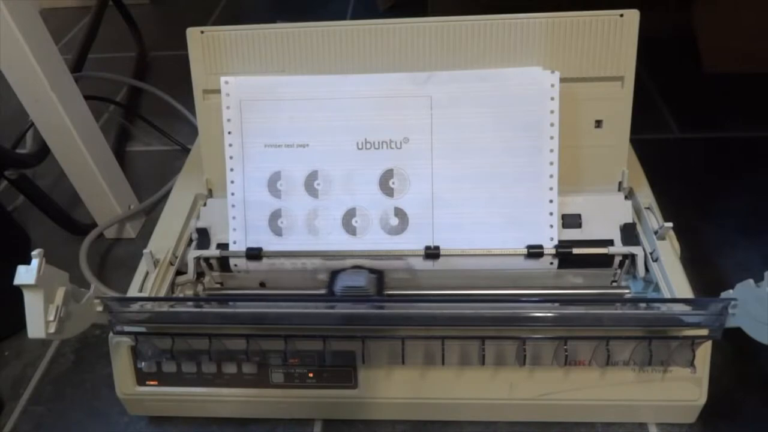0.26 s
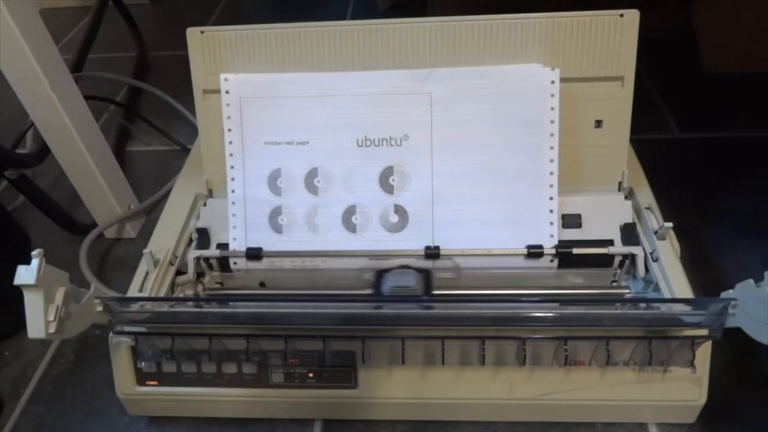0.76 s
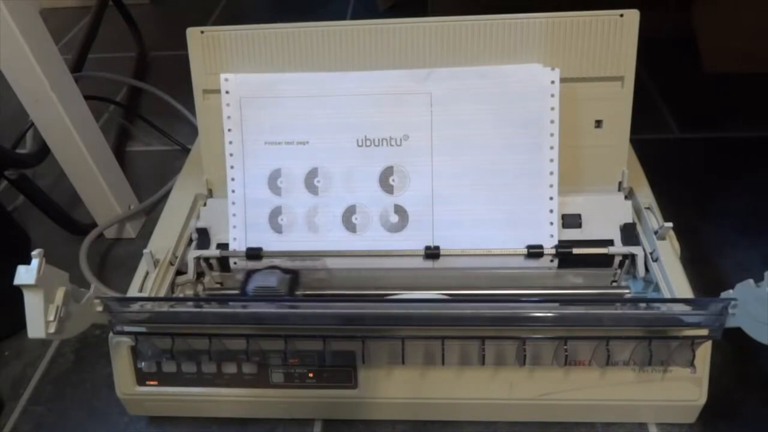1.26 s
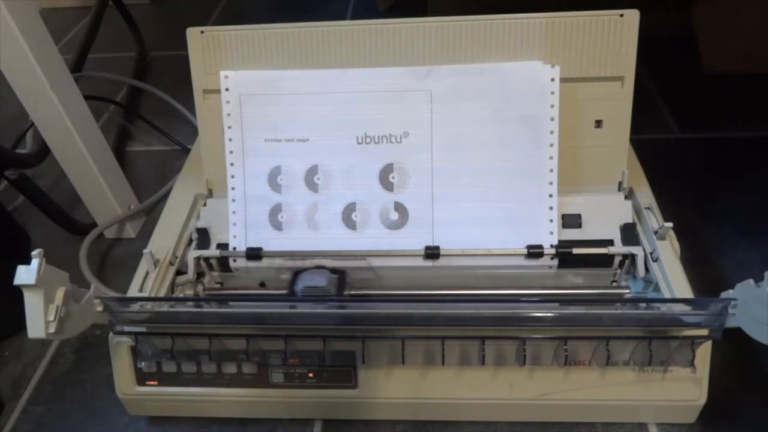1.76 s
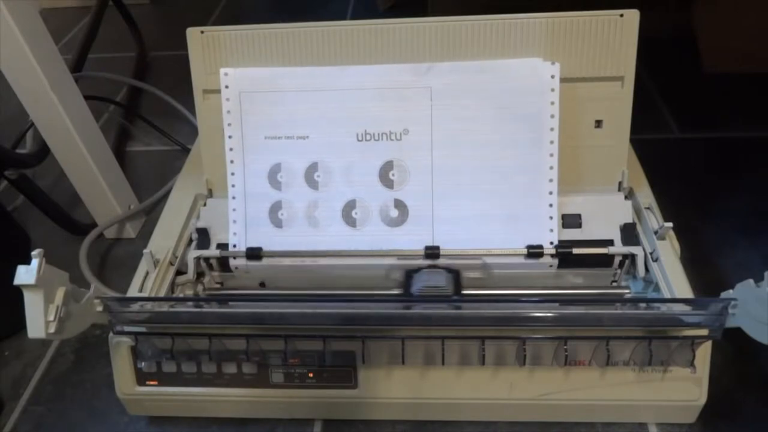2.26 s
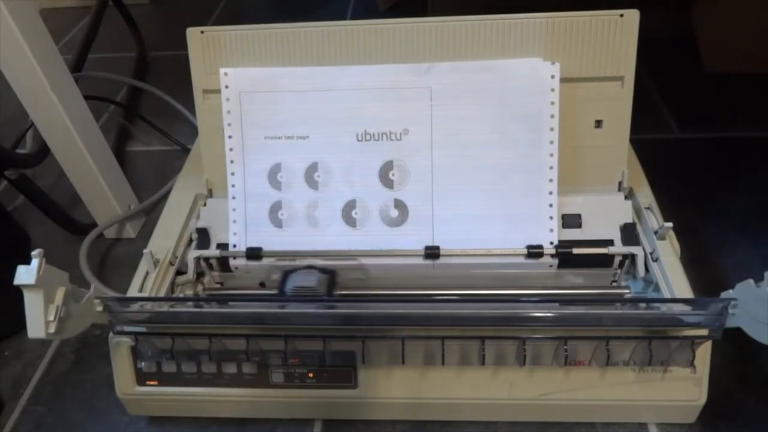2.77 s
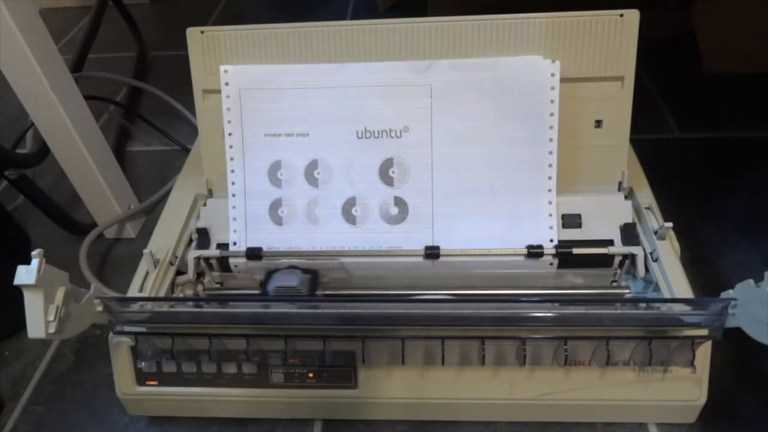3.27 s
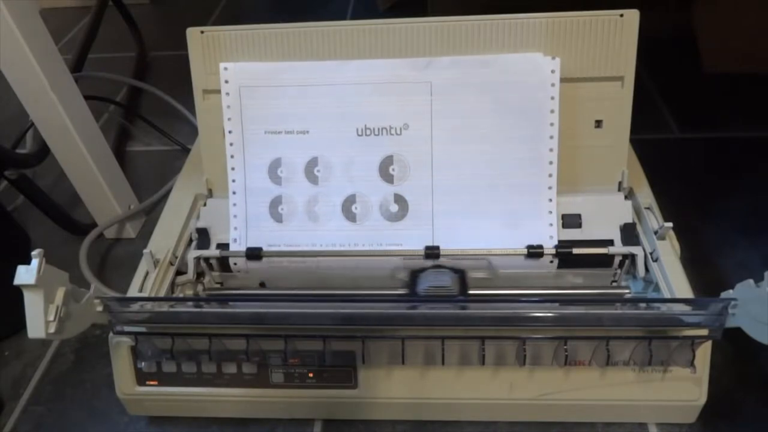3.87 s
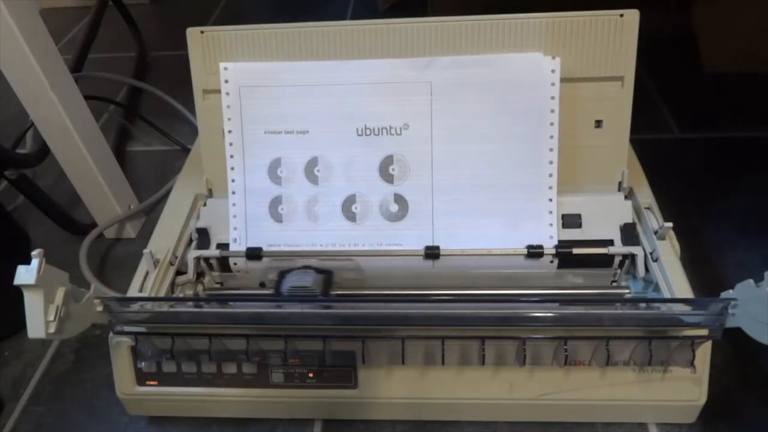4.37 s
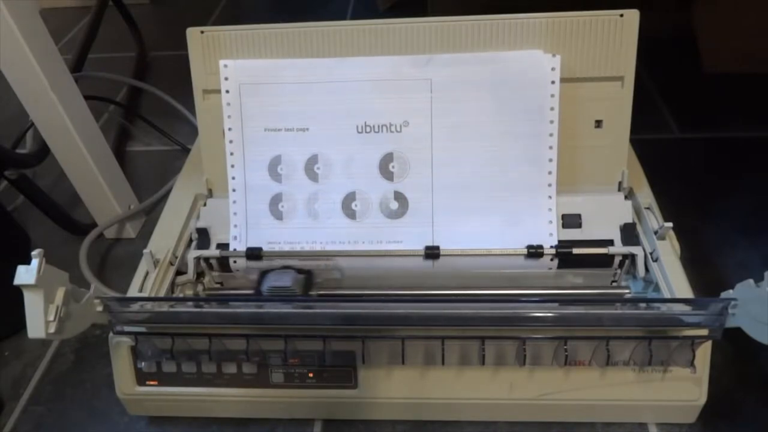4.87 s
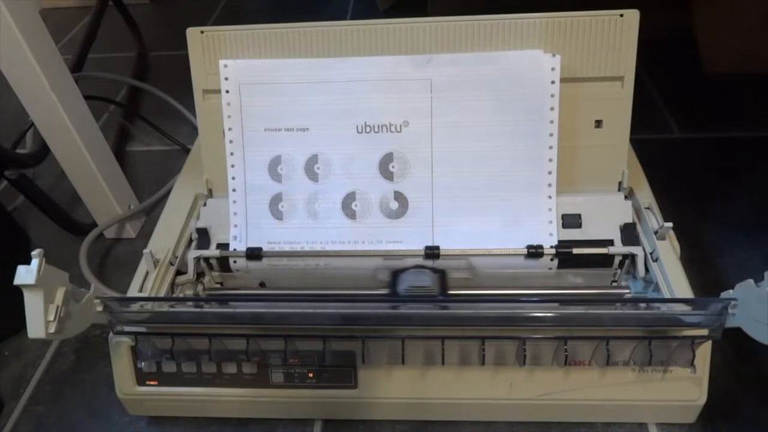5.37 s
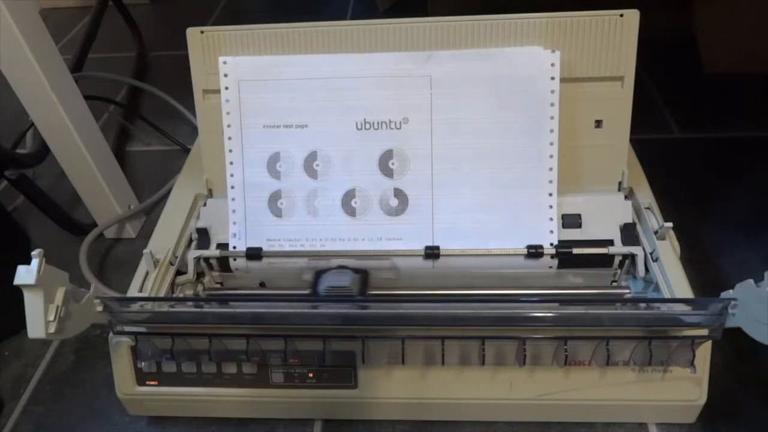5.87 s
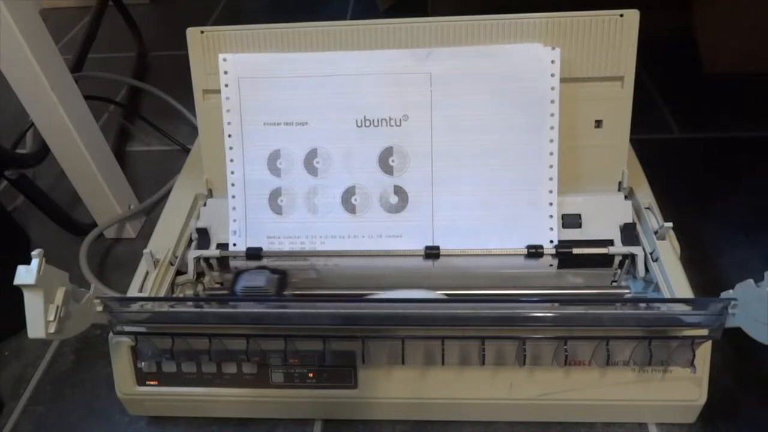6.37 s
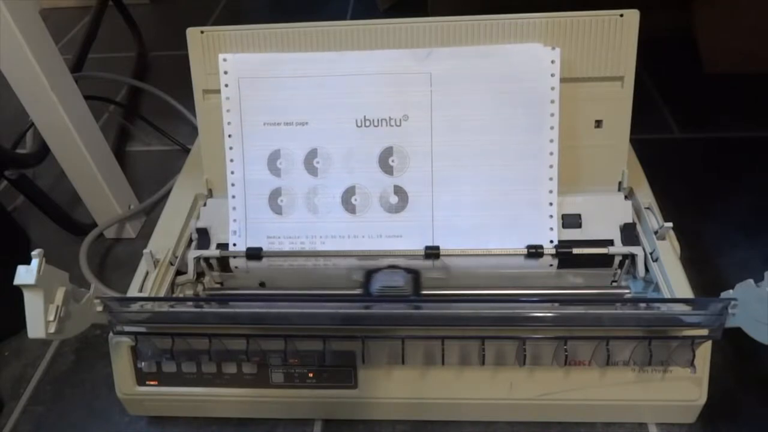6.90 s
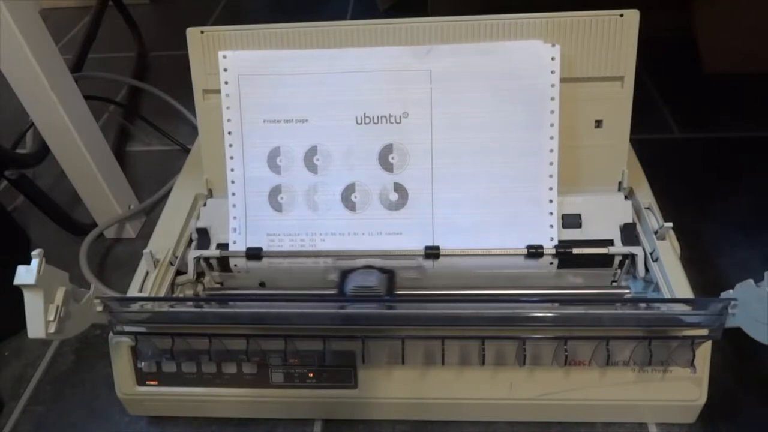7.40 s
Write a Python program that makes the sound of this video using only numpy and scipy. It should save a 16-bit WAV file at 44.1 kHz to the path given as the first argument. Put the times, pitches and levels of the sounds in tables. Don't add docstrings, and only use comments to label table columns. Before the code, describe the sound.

A dot matrix printer rasps out words in bright buzzing bursts over a droning carriage, with a sharp clack and paper jerk at every line.

```python
import sys
import numpy as np
from scipy import signal
from scipy.fft import rfft, irfft
from scipy.io import wavfile
from scipy.ndimage import uniform_filter1d

SR = 44100
rng = np.random.default_rng(int(sys.argv[2]) if len(sys.argv) > 2 else 0)


def file_out(sig):
    cols = np.atleast_2d(sig).T
    lim = np.clip(cols, -1, 1)
    pcm = np.round(lim * 32767).astype(np.int16)
    wavfile.write(sys.argv[1], SR, pcm)


def decibels_to_gain(level_db):
    exponent = np.asarray(level_db, float) / 20
    return 10 ** exponent


N = 336924
T = np.arange(N) / SR

# (frequency [Hz], level [dB])
RUMBLE_SPECTRUM = [(25, -20), (60, -12), (125, -1.5), (250, -1.5), (500, -15)]
RUMBLE_DB, RUMBLE_END_S = -50.5, 0.305
# (frequency [Hz], t60 [s], level [dB])
ROOM_BANDS = [(258, 0.32, 1), (1050, 0.13, -2), (2890, 0.13, -1), (7150, 0.26, -3), (13500, 0.14, -5)]
# (frequency [Hz], left lead [rad])
PORT_LAG = [(0, 0.69), (950, -0.5), (3100, 0.063), (16500, 0.11)]
# (frequency [Hz], left minus right [dB])
PORT_LEAN = [(60, 0.0), (110, 0.24), (200, 0), (380, 0.0), (700, 0.74), (1290, 1.0), (2380, 0),
             (4400, 0.73), (8120, 0.25), (15000, 0.12)]
# (frequency [Hz], level [dB])
PORT_APART = [(60, -30), (200, -32), (600, -19), (1200, -13), (2500, -20), (5000, -34.5), (15000, -39)]
BOOM_WET_DB, RING_WET_DB, GUIDE_WET_DB = -5, -2.5, -3

PASS_STEP_HZ = [311.3, 310.3, 310.4, 311.6, 311.6, 312.0, 311.8, 312.0, 311.4, 311.9]
PASS_S = 0.8127
# (share of pass, drone [dB], belt teeth [dB], rail hiss [dB], motor whine [dB])
RUN_RIGHT_LEVELS = [(.24, -56, -83.5, -55, -73), (.55, -57.5, -60, -56, -69), (.86, -58.5, -69, -58, -65.5)]
RUN_LEFT_LEVELS = [(.24, -61, -79.5, -56.5, -66.5), (.55, -59, -69.5, -59.5, -68.5),
                   (.86, -61.5, -79, -59, -68)]
# (drone [dB], teeth [dB], hiss [dB], whine [dB], needle brightness [dB])
PASS_TRIM = [(0, -2, -2.5, 0.5, -0.3), (2, 3.5, 1, 4, 0.1), (-0.1, 1.5, 0.2, 5, 0.4), (-0.5, 0, -0.1, 3, 6),
             (-0.2, 0, -0.5, 2.5, 0.6), (1.5, 1.5, -0.5, 2, 4.5), (-0.2, -0.5, -0.5, 1.5, 0),
             (0.8, 4, -1, 2.5, 3.5), (-0.7, -7, 0, 6, -0.5), (1, -6, 7, 1, 1)]
# (frequency [Hz], level [dB])
DRONE_SPECTRUM = [(18, -95), (30, -41), (91, -75), (173, -18), (317, -13.5), (355, -3.5), (580, -5.5),
                  (730, -6), (874, -17), (949, -2.5), (1500, -14.5), (1950, -39), (3300, -120)]
# (frequency [Hz], level [dB])
HISS_SPECTRUM = [(590, -38.5), (1000, -13), (1840, -5), (2060, -7.5), (2450, -2.5), (2970, -14),
                 (3490, -5.5), (3780, -14), (5780, -13), (11800, -18.5), (15500, -24)]
TEETH_HZ = 180.3
# (multiple of TEETH_HZ, level [dB])
TEETH_HARMONICS = [(1, -26), (2, -1), (3, 3)]
# (frequency [Hz], width [Hz], level [dB])
RATTLE_MODES = [(2410, 250, 9), (1830, 510, -21), (1020, 480, 5)]
# (multiple of the step rate, level [dB])
WHINE_HARMONICS = [(5, -11), (6, 0), (7, -8), (8, 1.5), (9, -6.5), (10, -6), (11, -6), (12, -20), (13, -7),
                   (14, -10.5), (15, -11), (18, -17), (19, -11.5)]
HALT_S, HALT_DB = 0.0019, -3

# (time [s], peak [dB])
GUIDE_TICKS = [(0.3571, -48), (0.381, -44), (0.4445, -42), (0.7356, -39), (0.777, -42), (0.893, -42),
               (1.0322, -43), (1.1107, -41), (1.151, -48), (1.2488, -45.5), (1.4088, -48), (1.575, -44),
               (1.901, -54), (1.934, -40), (2.051, -55), (2.0826, -42), (2.1221, -53), (2.4024, -44),
               (2.4437, -43), (2.5895, -44.5), (2.597, -47), (2.6886, -50), (2.75, -44), (3.6125, -47),
               (3.6436, -54), (3.7923, -55), (3.8586, -39.5), (3.9912, -39.5), (4.027, -42.5), (4.141, -44),
               (4.158, -39), (4.2136, -41.5), (4.308, -49), (4.3162, -39), (4.3267, -39), (4.8277, -43),
               (5.2445, -39), (5.2544, -45), (5.269, -47), (5.3314, -44.5), (5.4051, -55), (5.674, -45),
               (5.906, -47), (5.911, -41)]
# (frequency [Hz], level [dB], t60 [s])
GUIDE_MODES = [(1200, -18, .03), (1810, -5, 0.037), (2320, -3, 0.067), (2476, -7.5, 0.026),
               (2614, -3.5, 0.037), (3530, -8, 0.025)]
GUIDE_DB, GUIDE_ECHO_S = -6.5, 0.004
# (time [s], peak [dB], pitch [Hz])
SLACK_KNOCKS = [(0.378, -57, 464), (0.452, -51, 398), (1.254, -50, 407), (1.933, -47, 426),
                (2.032, -47, 360), (2.081, -45.5, 425), (2.686, -46, 357), (2.689, -47, 1000),
                (2.699, -53, 795), (3.607, -43, 466), (4.3, -46, 1800), (4.317, -46.5, 403),
                (4.608, -43, 940), (5.155, -45.5, 375), (5.209, -47, 366), (4.141, -47, 1150)]

# (time [s], solenoid pull [dB], paper thud [dB], release [dB])
LINE_FEEDS = [(0.614, -29.5, -37, -30), (1.4311, -28, -39, -32.5), (2.245, -27, -38, -29.5),
              (3.059, -26.5, -37, -30), (3.8697, -27, -37.5, -31), (4.6839, -27, -38.5, -31),
              (5.4924, -28, -36.5, -30), (6.3059, -28.5, -38, -30.5), (7.1151, -28, -37.5, -29.5)]
# (delay [s], level [dB], t60 [s])
PULL_PATTERN = [
    (0, 4.5, 0.013),
    (0.011, -4, 0.028),
    (0.034, -8, .04),
    (.043, -13, 0.03),
]
# (delay [s], level [dB], t60 [s])
RELEASE_PATTERN = [
    (0.0676, 2.5, 0.013),
    (0.0805, -5, 0.034),
]
# (delay [s], level [dB], t60 [s])
THUD_PATTERN = [(.006, -7, 0.088), (.013, -4.5, 0.067), (0.032, 2.5, 0.089), (.043, -15.5, 0.055),
                (.053, -28, .06), (0.078, -18, 0.091), (0.106, -16, 0.12)]
# (frequency [Hz], level [dB])
CLICK_SPECTRUM = [(470, -38), (1000, -11), (1660, -4.5), (3720, 2.5), (4370, -4), (4950, 2.5), (7180, 4.5),
                  (7840, 2.5), (9560, 9), (15500, -4.5)]
# (frequency [Hz], level [dB])
PAPER_SPECTRUM = [(35, -82), (60, -64), (107, -24), (360, -8.5), (437, 4.5), (825, -4.5), (962, 0.5),
                  (1240, -5), (1650, -3), (2330, -8), (3060, -6.5), (4950, -9.5), (6000, -7.5), (7800, -34),
                  (13200, -120)]
# (frequency [Hz], level [dB], t60 [s])
LATCH_MODES = [(4270, 0, 0.011), (5520, 2.5, 0.011), (7220, -4, 0.024)]
# (frequency [Hz], level [dB], t60 [s])
FRAME_MODES = [(1630, -10.5, 0.011)]
# (frequency [Hz], level [dB], t60 [s])
ROLLER_MODES = [(425, -20, .05), (690, -4.5, 0.054), (960, -1.5, 0.11), (1970, -2, 0.06), (2300, 0, 0.042),
                (2700, 1, 0.028)]
LATCH_DB, ROLLER_DB = -14, -4
ROLLER_LATE_S, FRAME_LATE_S = 0.034, 0.002204
# (delay [s], level [dB], part)
GEAR_JOLTS = [(.0085, -8, 0), (0.0138, -5, 1), (.024, -5, 0), (.0325, -3.5, 2), (.037, -5.5, 1),
              (.043, -6.5, 0), (.051, -8.5, 1), (.059, -9.5, 1), (.073, -10, 0), (.11, -12, 1)]
# (frequency [Hz], level [dB], t60 [s])
GEAR_MODES = [
    [(810, 3, 0.016), (934, 0, 0.041), (2330, 1, 0.022)],
    [(416, 0, 0.043), (480, 0, 0.025), (1720, -11, .02)],
    [(610, -2, 0.027), (735, -5, .03), (2760, 7, .02)],
]
# (solenoid frame [dB], gear part 0 [dB], part 1 [dB], part 2 [dB])
FEED_TRIM = [(1.5, 0.092, -7, -5), (-2, 0, 1, 2), (1.5, 0, 2, -7), (-2.5, 0, -1, 1), (2, 1, 1.5, -3),
             (-0.5, 0, 1, -2), (1, 1, 1, -0.5), (-1.5, 0, 0, -11), (1.5, 0.11, -3, 2.5)]
JOLT_DB, JOLT_SPREAD_S = -7, 0.00075

# (time [s], length [s], needles [dB],
# platen ring [dB], platen boom [dB])
WORDS = [(0.0007, 0.16, -40, -19, -16), (1.5853, 0.093, -38, -11.5, -18.5),
         (1.6636, 0.093, -36.5, -13.5, -21), (1.7679, 0.038, -38.5, -15, -12.5),
         (3.2134, 0.064, -38, -20, -18), (3.2809, 0.061, -37, -23, -28),
         (3.359, 0.044, -37, -22, -20), (3.4045, 0.017, -37, -12, -17),
         (3.4405, 0.036, -38, -11.5, -14.5), (4.8371, 0.068, -37, -13, -17),
         (4.9162, 0.083, -38, -14, -14.5), (5.017, 0.034, -38, -13, -18),
         (5.0618, 0.019, -37, -10.5, -15), (5.0963, 0.039, -38, -11, -15),
         (6.4589, 0.086, -36.5, -21, -18.5), (6.5594, 0.067, -37, -18, -22),
         (6.6382, .030, -35, -24, -22), (6.6835, 0.077, -38.5, -14, -17),
         (6.7622, 0.08, -37, -13.5, -18), (6.8322, 0.045, -38.5, -5.5, -6),
         (6.8773, 0.062, -37, -9.5, -4.5), (6.9458, 0.066, -36, -11.5, -5.5),
         (7.0084, 0.052, -38.5, -7.5, -3), (7.0535, 0.03, -38.5, -9.5, -5),
         (2.761, .032, -42.5, -9, -5), (2.8087, 0.083, -42.5, -5.5, -7),
              (2.909, 0.064, -43, -2.5, -9.5), (4.3412, 0.035, -42, -12, -14),
              (4.386, 0.067, -40.5, -13, -13.5), (4.465, .130, -40, -19, -16.5),
              (5.931, 0.066, -41, -14.5, -12.5), (6.008, 0.037, -40, -25, -12.5),
              (6.054, 0.09, -40, -17.5, -11), (6.157, 0.066, -39, -18, -18.5),
              (7.22, 0.065, -38.5, -7.5, -11.5), (7.286, .055, -39, -5.5, -5.5),
              (7.338, 0.035, -44, -7, -0.5), (7.368, 0.063, -38.5, -5.5, -10.5),
              (7.4275, 0.11, -38.5, -8.5, -17), (7.552, 0.037, -39, -11, -11.5),
              (7.597, 0.027, -37.5, -12, -18), (7.6314, 0.011, -40, -7, -14)]
THIN_LETTERS = [0.116, 1.713, 1.747, 1.768, 1.78, 1.791, 2.773, 2.808, 3.293, 3.304, 3.371, 3.384, 3.462,
                4.467, 4.952, 4.998, 5.041, 5.121, 6.056, 6.157, 6.179, 6.608, 6.662, 6.742, 6.832, 6.843,
                6.886, 6.899, 6.946, 6.965]
# (time [s], level [dB])
LETTER_INK = [(0.001, 3.5), (0.012, 1), (0.035, -2.5), (0.046, 2.5), (0.057, 2.0), (0.113, -1.0),
              (0.158, -3.0), (1.585, 1.0), (1.608, -2.5), (1.63, 1.5), (1.653, -3), (1.697, 0.5),
              (1.731, -4), (1.742, -4), (1.768, 2.5), (1.802, -1.5), (2.784, 0), (2.82, -4), (2.888, -1),
              (2.931, -5), (2.964, 0.5), (3.213, 3.5), (3.225, -1), (3.27, -1.0), (3.281, 2), (3.292, -2),
              (3.303, -4), (3.337, -2), (3.393, -4.0), (3.404, 2), (3.416, -0.5), (3.452, 1.0), (4.409, -7),
              (4.533, -3), (4.86, -3), (4.905, -3.5), (5.051, -5.0), (5.13, -4.5), (5.964, -6), (6.031, 2),
              (6.042, -8), (6.099, 1.5), (6.179, 2), (6.504, -12), (6.515, -1), (6.684, 2.0), (6.706, -5),
              (6.74, 1.5), (6.751, -6), (6.843, 0), (6.877, -3.5), (6.9, 2.5), (7.287, 0), (7.44, -3),
              (7.586, 1), (7.618, -3.0)]
LETTER_S, LETTER_COLUMNS = 0.01127, 14
WIDE_COLUMNS, NARROW_COLUMNS = 10.84, 5.8
LETTER_SCATTER_DB, FIRST_LETTER_DB, NARROW_DB = -0.2, 1, 0.5
RING_SCATTER_DB, LETTER_SWELL = 1.2, 0.4
STEM_DB, STEM_S = 2, 0.002
# (frequency [Hz], level [dB])
NEEDLE_SPECTRUM = [(900, -56.5), (1500, -7.5), (2800, -8.5), (4600, -6), (7300, -1), (9000, 0.5),
                   (11500, -1.5), (13500, -3), (15600, -11)]
REBOUND_SAMPLES, REBOUND = 35, 0.22
# (frequency [Hz], level [dB])
RING_SPECTRUM = [(1300, -35), (2500, 1.5), (3750, -0.5), (5000, -3.5), (6250, -5.5), (7500, -1),
                 (10000, -5.5), (15500, -6.5)]
# (time [s], third [dB], fourth [dB], fifth [dB])
OVERTONE_LIFT = [(.02, 6, 3, 0), (.16, 4, -3, -2), (1.6, -1, 0, 0), (1.8, 3, -2, 0), (2.77, -1, 2, -1),
                 (2.97, -1, -3, 1), (3.23, 0, 6, 6), (3.33, 2, 6, 5), (3.42, 5, -1, -2), (4.35, 3, 5, 11),
                 (4.59, 1, 9, 12), (4.85, 2, 3, -5), (4.95, 3, 3, -1), (5.12, 3, 2, 2), (5.94, 5, 12, 14),
                 (6.08, 8.5, 6, 7), (6.22, 4, 9, 8), (6.47, 3, 8, 3), (6.7, 2, 8, 3), (6.85, 2, 6, -1),
                 (6.98, 0, 4, 5), (7.08, 1, -1, -3), (7.23, 1, 3.5, -3), (7.4, -2, 4, 0),
                 (7.6, -1.5, 3, -5)]
OVERTONES_HZ = [3740, 4990, 6240]
ROOM_MODE_HZ, ROOM_MODE_WIDTH_HZ, ROOM_MODE_DB = 1260.5, 10, -1.5

START_GAIN_DB, GAIN_RISE_S, GAIN_FULL_S = -4.5, 0.92, 1.09
GAP_S, GAP_WIDTH_S, GAP_DB = 4.294, 0.004, -17
TOP_HZ, SHARP_DB, SHARP_TOP_DB = 15650, 12, -3


def read(table, hz):
    f, v = np.transpose(table)
    return np.interp(np.log(hz + 1), np.log(f + 1), v)


def colour(x, table, size=2048):
    cep = irfft(read(table, np.fft.rfftfreq(size, 1 / SR)) * np.log(10) / 20)
    cep[1:size // 2] *= 2
    cep[size // 2 + 1:] = 0
    ir = irfft(np.exp(rfft(cep)))
    return signal.oaconvolve(x, ir / np.sqrt(np.sum(ir ** 2)))[:len(x)]


def resonate(x, hz, width_hz):
    return signal.lfilter(*signal.iirpeak(hz, hz / width_hz, SR), x)


def low_cut(x, hz):
    return signal.sosfilt(signal.butter(3, hz, "high", fs=SR, output="sos"), x)


def walk(rate_hz):
    k = int(SR / rate_hz)
    held = np.repeat(rng.standard_normal(N // k + 1), k)
    return uniform_filter1d(uniform_filter1d(held, k), k)[:N] * 4 / 3


def clicks(times_s, sizes):
    at = np.clip(times_s * SR, 0, N - 2)
    i = at.astype(int)
    return np.bincount(i, sizes * (1 - at + i), N) + np.bincount(i + 1, sizes * (at - i), N)


def fade(x, t60_s):
    return signal.lfilter([1], [1, -np.exp(-np.log(1000) / (t60_s * SR))], x)


def bursts(times_s, db, pattern):
    env = sum(fade(clicks(times_s + later_s, decibels_to_gain(db + step_db)), t60_s)
              for later_s, step_db, t60_s in pattern)
    return uniform_filter1d(env, size=36) * rng.standard_normal(N)


def strike(times_s, db, modes):
    out = 0
    for hz, mode_db, t60_s in modes:
        blows = clicks(times_s, decibels_to_gain(db + mode_db + 2 * rng.standard_normal(len(times_s))))
        pole = np.exp((2j * np.pi * hz - np.log(1000) / t60_s) / SR)
        out = out + signal.lfilter([1], [1, -pole], blows).imag
    return out


def pass_number():
    return np.searchsorted(np.transpose(LINE_FEEDS)[0], T)


def wind_rumble():
    fade_out = np.clip((RUMBLE_END_S - T) / 0.13, 0, 1)
    return colour(rng.standard_normal(N), RUMBLE_SPECTRUM) * decibels_to_gain(RUMBLE_DB) * fade_out


def room(x, size=8192):
    t, count = np.arange(2 * size) / SR, N // size + 2
    tails = 0
    for hz, t60_s, db in ROOM_BANDS:
        band_hz = [hz / 2.01, min(hz * 1.475, SR * .45)]
        sos = signal.butter(2, band_hz, "band", fs=SR, output="sos")
        env = decibels_to_gain(-60 * t / t60_s) * np.minimum(t / 0.005, 1)
        noise = signal.sosfilt(sos, rng.standard_normal((count, len(t))))
        tails = tails + noise * env * decibels_to_gain(db) / np.sqrt(np.sum(env ** 2))
    padded, out = np.pad(x, (size, 3 * size)), np.zeros(N + 8 * size)
    for k, tail in enumerate(tails):
        piece = padded[k * size:(k + 2) * size] * np.sqrt(np.hanning(2 * size))
        out[k * size:(k + 4) * size - 1] += signal.fftconvolve(piece, tail)
    return out[size:size + N]


def travel():
    n = pass_number()
    feeds_s = np.transpose(LINE_FEEDS)[0]
    share = (T - np.r_[feeds_s[0] - PASS_S, feeds_s][n]) / PASS_S

    def along(run):
        at, *levels_db = np.transpose(run)
        return np.array([np.interp(share, at, db) for db in levels_db])

    levels_db = np.where(n % 2, along(RUN_LEFT_LEVELS), along(RUN_RIGHT_LEVELS))
    return uniform_filter1d(levels_db + np.transpose(PASS_TRIM)[:-1, n], size=3000, axis=1)


def carriage(steps):
    drone_db, teeth_db, hiss_db, whine_db = travel()
    shake = 1 + 0.11 * np.cos(2 * np.pi * steps)
    drone = colour(rng.standard_normal(N) * shake, DRONE_SPECTRUM) * decibels_to_gain(drone_db - 1.5 + 1.8 * walk(25))
    teeth = sum(decibels_to_gain(teeth_db + db + walk(6.2)) * np.sin(k * (2 * np.pi * TEETH_HZ * T + 0.36 * walk(15)))
                for k, db in TEETH_HARMONICS)
    hiss = colour(rng.standard_normal(N) * shake, HISS_SPECTRUM) * decibels_to_gain(hiss_db + walk(30))
    blows = (rng.random(N) < 90 / SR) * decibels_to_gain(2.0 * rng.standard_normal(N) - 6)
    taps = fade(blows, 0.12) * rng.standard_normal(N)
    rattle = sum(resonate(resonate(taps, hz, 2 * width_hz), hz, width_hz) * decibels_to_gain(db + hiss_db)
                 for hz, width_hz, db in RATTLE_MODES)
    whine = sum(decibels_to_gain(db + 2.6 * walk(24)) * np.sin(2 * np.pi * k * steps + 1.6 * walk(26))
                for k, db in WHINE_HARMONICS)
    halt = decibels_to_gain(HALT_DB * sum(np.exp(-((T - feed[0]) / HALT_S + .5) ** 2) for feed in LINE_FEEDS))
    return (drone + teeth + hiss + rattle + whine * decibels_to_gain(whine_db)) * halt


def ribbon_guide():
    s, db = np.transpose(GUIDE_TICKS)
    first = strike(s, db + GUIDE_DB, GUIDE_MODES)
    rebound = strike(s + GUIDE_ECHO_S, db + GUIDE_DB - 10.5, GUIDE_MODES)
    return low_cut(first + rebound, 650)


def knocks():
    out, t = np.zeros(N + 4000), np.arange(4000) / SR
    for s, db, hz in SLACK_KNOCKS:
        noise = rng.standard_normal(len(t))
        noise[0] = 14
        ring = resonate(resonate(noise * np.exp(-t / 0.015), hz, hz), hz, hz / 2)
        tap = resonate(resonate(noise * np.exp(-t / 0.008), hz, hz * 2), hz, hz * 2)
        knock = ring / np.abs(ring).max() + 1.8 * tap / np.abs(tap).max()
        out[int(s * SR):int(s * SR) + len(t)] += knock * decibels_to_gain(db - 5)
    return low_cut(out[:N], 250)


def gears():
    s, pull_db, thud_db, _ = np.transpose(LINE_FEEDS)
    frame_db, *parts_db = np.transpose(FEED_TRIM)
    out = sum(strike(s + later_s + FRAME_LATE_S, pull_db + frame_db, FRAME_MODES)
              for later_s in (0, RELEASE_PATTERN[0][0]))
    for later_s, db, part in GEAR_JOLTS:
        part = int(part)
        when_s = s + later_s + JOLT_SPREAD_S * rng.standard_normal(len(s))
        out = out + strike(when_s, thud_db + db + JOLT_DB + parts_db[part], GEAR_MODES[part])
    return low_cut(out, 250)


def line_feeds():
    s, pull_db, thud_db, release_db = np.transpose(LINE_FEEDS)
    clack = bursts(s, pull_db - 8.0, PULL_PATTERN) + bursts(s, release_db - 4.5, RELEASE_PATTERN)
    thud = bursts(s, thud_db - 6.0, THUD_PATTERN)
    latch = strike(s + 0.001516, pull_db + LATCH_DB, LATCH_MODES)
    latch = latch + strike(s + RELEASE_PATTERN[0][0], release_db + LATCH_DB + 3.5, LATCH_MODES)
    roller_s = s + ROLLER_LATE_S
    roller = strike(roller_s, thud_db + ROLLER_DB - 5, ROLLER_MODES)
    roller = roller + strike(roller_s + 0.0074, thud_db + ROLLER_DB - 18, ROLLER_MODES)
    return colour(clack, CLICK_SPECTRUM) + colour(thud, PAPER_SPECTRUM) + low_cut(latch + roller, 300)


def letters():
    rows = []
    ink_s, ink_trim_db = np.transpose(LETTER_INK)
    for s, length_s, db, ring_db, boom_db in sorted(WORDS):
        chance, ring, boom = rng.standard_normal((3, 16))
        k = np.arange(min(int(np.ceil(length_s / LETTER_S)), 16))
        start_s = s + k * LETTER_S
        thin = np.abs(start_s - np.c_[THIN_LETTERS]).min(axis=0) < LETTER_S / 2
        ink_db = ink_trim_db @ (np.abs(start_s - np.c_[ink_s]) < LETTER_S / 2)
        inked_s = np.where(thin, NARROW_COLUMNS, WIDE_COLUMNS) / LETTER_COLUMNS * LETTER_S
        width_s = np.minimum(inked_s, length_s - k * LETTER_S)
        level_db = db + LETTER_SCATTER_DB * chance[k] + NARROW_DB * thin + ink_db + FIRST_LETTER_DB * (k == 0)
        rows += zip(start_s, width_s, level_db,
                    ring_db + RING_SCATTER_DB * ring[k], boom_db + RING_SCATTER_DB * boom[k])
    return np.transpose(rows)


def needles(steps):
    columns_s = np.interp(np.arange(1, int(steps[-1] * 4)), steps * 4, T)
    start_s, width_s, db, ring_db, boom_db = letters()
    k = np.searchsorted(start_s, columns_s) - 1
    into_s = columns_s - start_s[k]
    inside = (k >= 0) & (into_s < width_s[k])
    chance = rng.standard_normal((5, len(columns_s)))
    swell = 1 - LETTER_SWELL * np.cos(np.pi * np.clip(into_s / width_s[k], 0, 1)) ** 2
    size = inside * decibels_to_gain(db[k])

    stem_db = STEM_DB * np.exp(-into_s / STEM_S)
    hits = clicks(columns_s + 60e-6 * chance[0], size * decibels_to_gain(3.0 * chance[1] + stem_db))
    crack = fade(hits, 0.0055) * np.tanh(2 * rng.standard_normal(N)) * 1.217
    crack = signal.lfilter([1], np.r_[1, np.zeros(REBOUND_SAMPLES - 1), -REBOUND], crack)
    crack = colour(crack, NEEDLE_SPECTRUM) * decibels_to_gain(-4.5)
    bright_db = np.transpose(PASS_TRIM)[-1][pass_number()]
    edge = resonate(crack, 10500, 3100) * (decibels_to_gain(1.35 * bright_db) - 1)

    letter_chance = chance[4, np.searchsorted(columns_s, start_s)[k] % len(columns_s)]
    flight_s = 62e-6 * letter_chance + 20e-6 * chance[2]
    thump = clicks(columns_s + flight_s, swell * 1.3 * size * decibels_to_gain(2.2 * chance[3] + ring_db[k]))
    ring = low_cut(colour(thump, RING_SPECTRUM), 400) * decibels_to_gain(17.5)
    when_s, *tops_db = np.transpose(OVERTONE_LIFT)
    lift = [decibels_to_gain(np.interp(T, when_s, top_db)) - 1 for top_db in tops_db]
    ring = ring + sum(resonate(ring, hz, 700) * gain for hz, gain in zip(OVERTONES_HZ, lift))

    blows = clicks(columns_s, swell * 1.04 * size * decibels_to_gain(boom_db[k]))
    boom = resonate(blows, 1317, 146) * decibels_to_gain(26.5)
    boom = low_cut(boom + resonate(boom, ROOM_MODE_HZ, ROOM_MODE_WIDTH_HZ) * decibels_to_gain(ROOM_MODE_DB), 410)
    return crack + edge, ring, boom


def two_ports(mid):
    f = np.fft.rfftfreq(N, 1 / SR)
    half = decibels_to_gain(read(PORT_LEAN, f) / 2) * np.exp(1j * read(PORT_LAG, f) / 2)
    apart = rfft(room(mid)) * decibels_to_gain(read(PORT_APART, f) + 0.5)
    whole = rfft(mid)
    return np.array([irfft(whole * half + apart, N), irfft(whole / half - apart, N)])


def scene():
    steps = np.cumsum(np.take(PASS_STEP_HZ, pass_number())) / SR
    crack, ring, boom = needles(steps)
    hits = crack + line_feeds() + gears() + knocks()
    guide = ribbon_guide()
    wet = room(hits + decibels_to_gain(BOOM_WET_DB) * boom + decibels_to_gain(RING_WET_DB) * ring + decibels_to_gain(GUIDE_WET_DB) * guide)
    return two_ports(hits + wet + ring + boom + guide + carriage(steps) + wind_rumble())


def sharp_top(x):
    band = signal.ellip(6, .3, 70, [TOP_HZ, 16800], "band", fs=SR, output="sos")
    power = low_cut(x[0], 5000) ** 2 + 1e-12
    now = uniform_filter1d(power, size=180)
    before = uniform_filter1d(power, size=700, origin=349)
    jump = now > np.roll(before, 140) * decibels_to_gain(2 * SHARP_DB)
    near = uniform_filter1d(1. * jump, size=120) > .01
    return signal.sosfilt(band, x) * decibels_to_gain(SHARP_TOP_DB) * uniform_filter1d(1. * near, size=60)


def band_limit(x):
    return signal.sosfilt(signal.butter(12, 16980, fs=SR, output="sos"), x)


def record(dry):
    gain_db = np.interp(T, [GAIN_RISE_S, GAIN_FULL_S], [START_GAIN_DB, 0])
    gap_db = GAP_DB * np.exp(-((T - GAP_S) / GAP_WIDTH_S) ** 2)
    x = np.tanh(dry * 15) / 15 * decibels_to_gain(gain_db + gap_db)
    top = signal.ellip(9, .3, 60, TOP_HZ, fs=SR, output="sos")
    return band_limit(signal.sosfilt(top, x) + sharp_top(x))


dry = scene()
out = record(dry)
file_out(out)
```